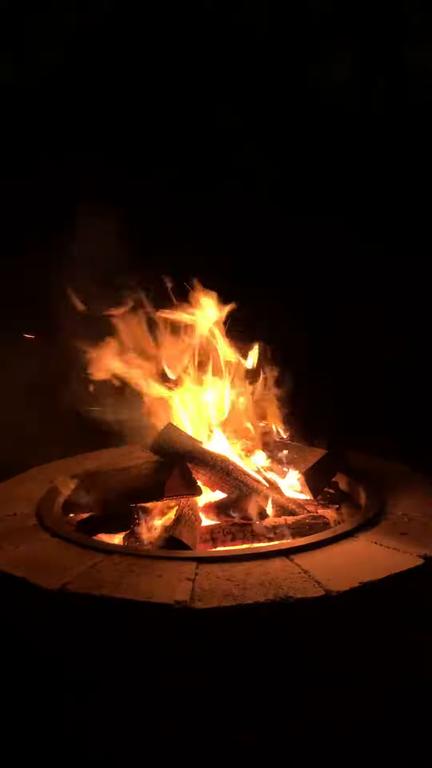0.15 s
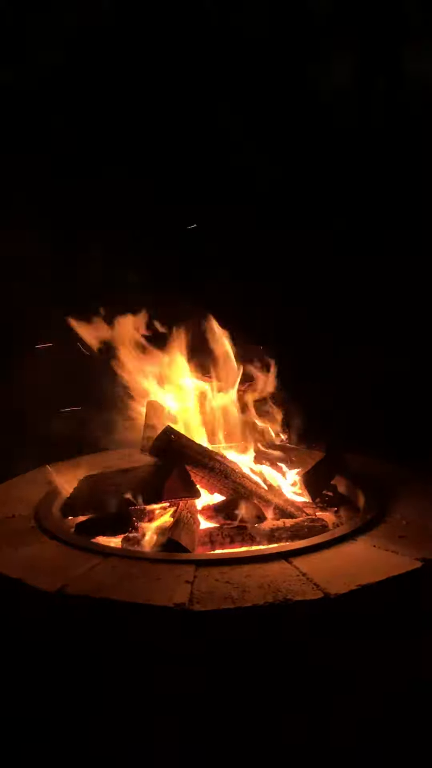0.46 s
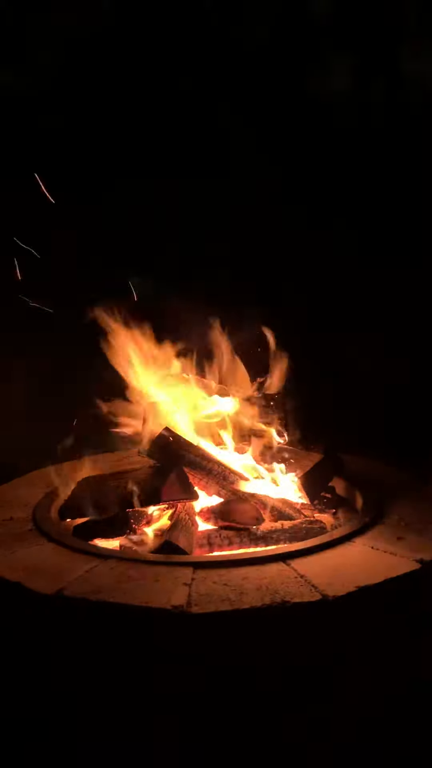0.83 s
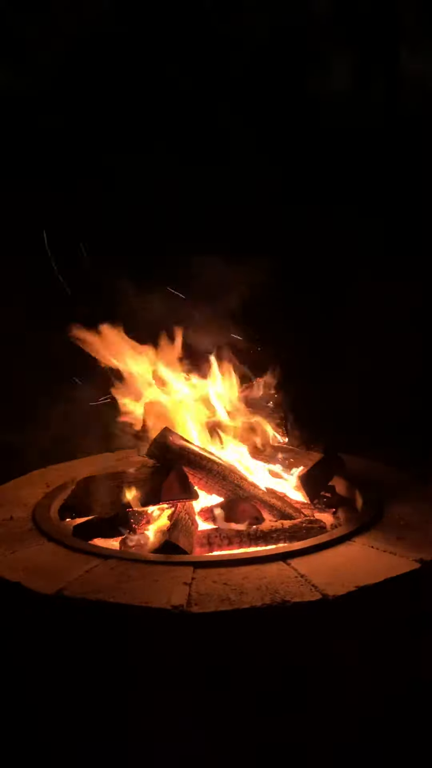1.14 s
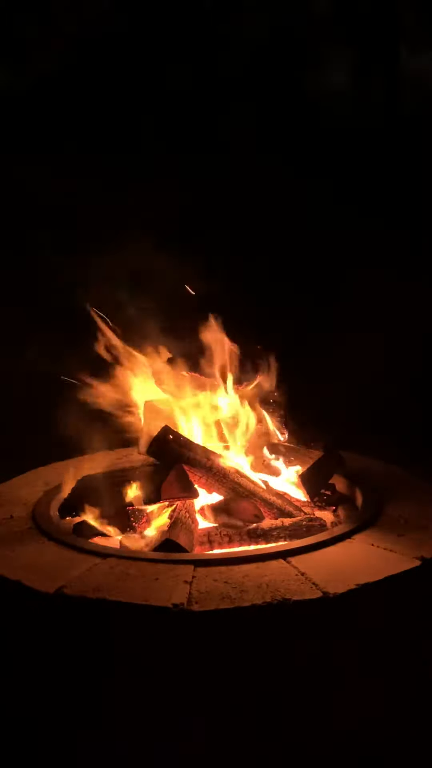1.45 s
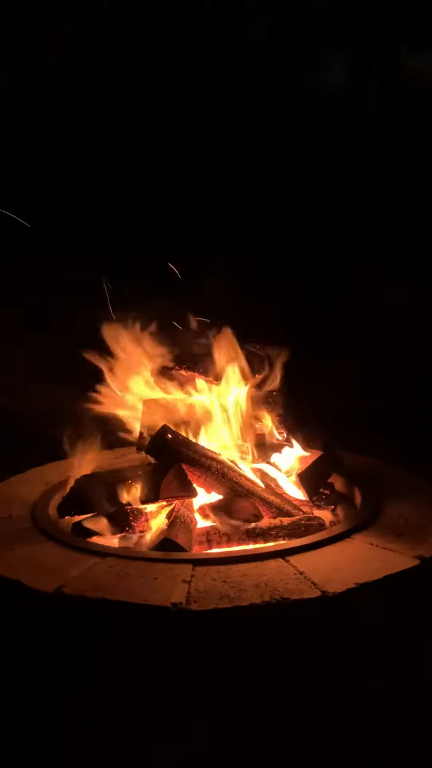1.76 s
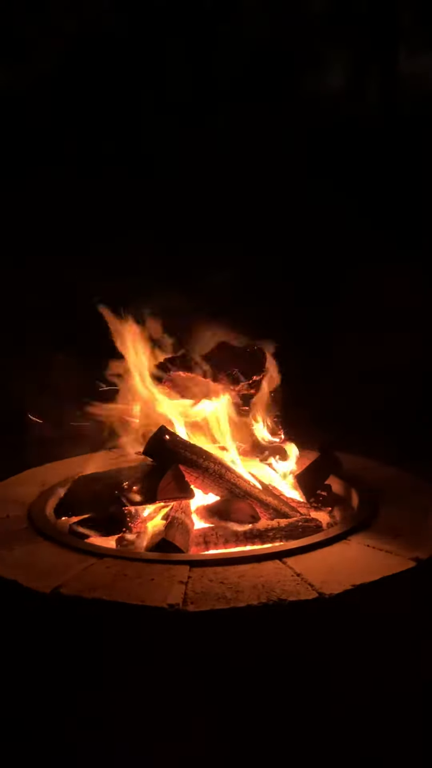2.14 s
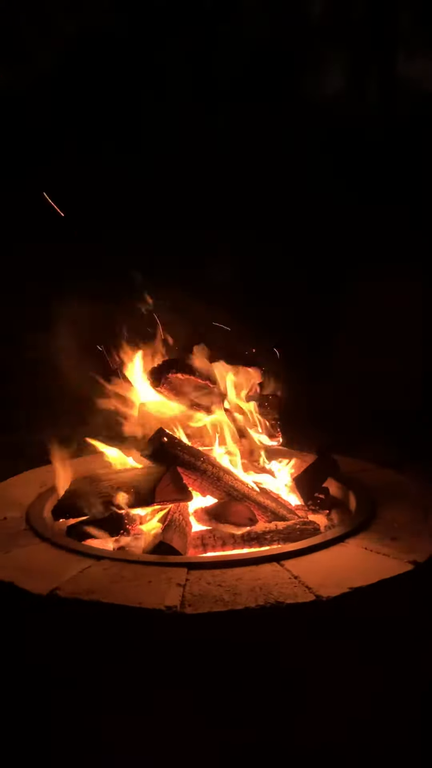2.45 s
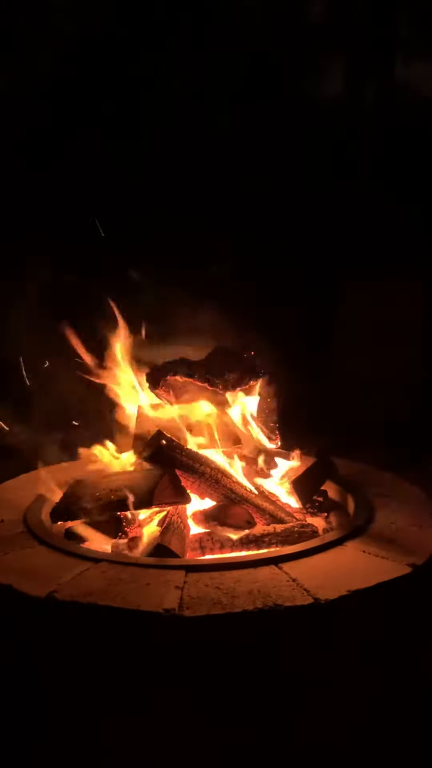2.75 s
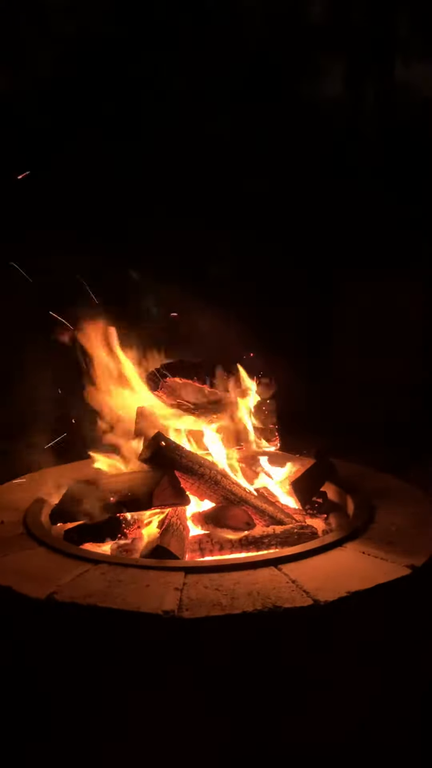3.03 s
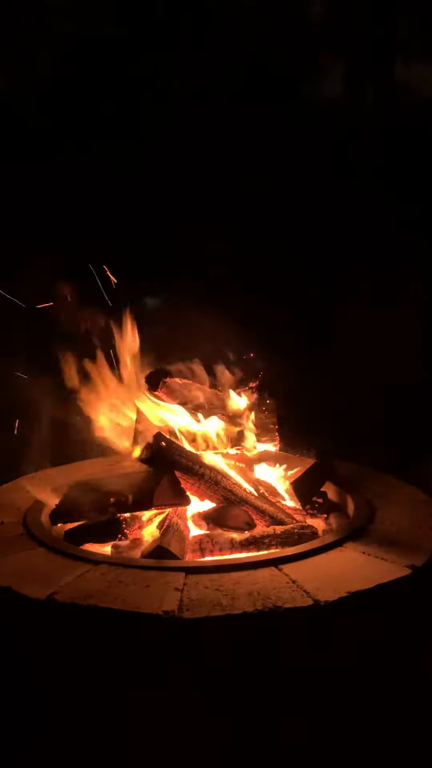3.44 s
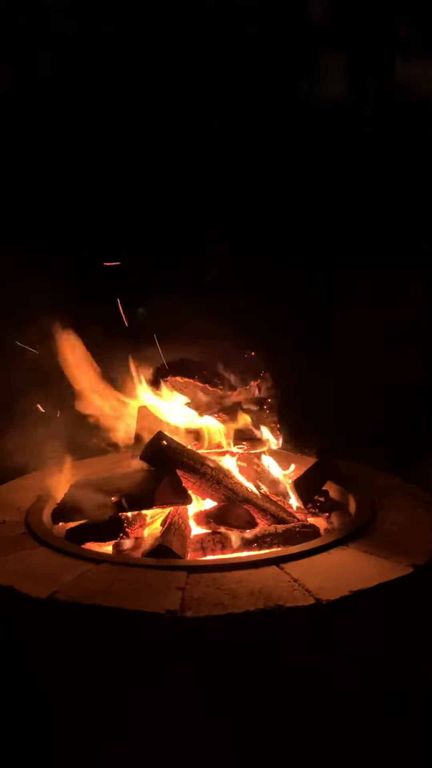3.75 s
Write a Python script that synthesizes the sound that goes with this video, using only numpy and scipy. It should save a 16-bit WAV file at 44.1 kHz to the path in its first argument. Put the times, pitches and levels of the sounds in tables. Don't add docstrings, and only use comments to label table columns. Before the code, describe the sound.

Close stereo microphone on a night campfire: woody pops come early, then sparser small crackles and a bright hard snap, while sap fizzes and whistles very high and a low hum sits under quiet open air.

```python
import sys
import numpy as np
from scipy import signal
from scipy.fft import rfft, irfft, next_fast_len
from scipy.io import wavfile
from scipy.ndimage import uniform_filter1d, map_coordinates

SR = 44100
rng = np.random.default_rng(int(sys.argv[2]) if len(sys.argv) > 2 else 0)


def how_loud(loudness_db):
    steps = np.asarray(loudness_db, float) / 20
    return 10 ** steps


def pcm_store(signal):
    levels = np.round(np.clip(np.atleast_2d(signal), -1, 1) * 32767)
    wavfile.write(sys.argv[1], SR, levels.astype(np.int16).T)


N = 171549

# (frequency [Hz], density [dB per Hz])
AIR_SPECTRUM = [(150, -20), (300, -8), (500, -10.5), (1030, -14.5), (2000, -23.5), (4000, -33), (5000, -37),
                (9000, -120)]
# (frequency [Hz], level [dB], wander [Hz])
MACHINE_TONES = [(59.2, -44.5, 1.5), (106.5, -46, 4), (212.5, -62, 3), (255.3, -59.5, 1.5),
                 (297, -62.5, 2.5), (413.5, -66, 2), (508.6, -69, 2), (707, -69.5, 2.5), (884, -72, 2),
                 (1002, -68, 2.5), (1226.5, -73, 3), (1592, -79, 1.5), (2565.5, -78.5, 2.4)]
# (time [s], level [dB])
MACHINE_LOAD = [
    (0.0, -60),
    (0.05, -41),
    (0.51, -54),
    (0.62, -37.5),
    (1.12, -45),
    (1.46, -39.5),
    (2.1, -49.5),
    (2.32, -43.5),
    (3.79, -43),
    (3.89, -54),
]
# (frequency [Hz], density [dB per Hz])
ROAR_SPECTRUM = [(20, -44), (32, -12.5), (50, -5.5), (92, 1.5), (120, -4), (160, -10.5), (260, -11.5),
                 (900, -100)]
# (time [s], level [dB])
FLAME_STRENGTH = [(0.0, -52.5), (0.46, -42.5), (0.49, -52.5), (0.65, -42.5), (1.19, -46.5), (1.38, -39.5),
                  (1.41, -48), (1.52, -42.5), (1.7, -47), (1.73, -41.5), (1.95, -44), (1.98, -38.5),
                  (2.23, -44.5), (3.89, -46)]
# (frequency [Hz], density [dB per Hz])
FIZZ_SPECTRUM = [(2000, -56), (4000, -6.5), (6000, -7), (7600, -14), (8800, -6), (10800, -10), (12800, 0.5),
                 (15000, -7), (15700, -10.5)]
# (time [s], gain [dB])
FIZZ_CHOKE = [(0, -3), (.85, -3), (.95, -13), (1.03, -2), (1.25, -6), (1.4, 0), (1.75, -6), (2, -1),
              (2.42, -1), (2.5, -10), (2.58, 0), (3.26, 0), (3.3, -11), (3.45, -5), (3.62, -14), (3.7, 0)]
# (time [s], pitch [Hz], level [dB], width [Hz])
WHISTLE = [(0, 14000, -64, 450), (.25, 14000, -68, 450), (.55, 14400, -64, 450), (.85, 13950, -70, 349),
           (.87, 12670, -58, 1900), (.97, 12900, -58, 1600), (.99, 13200, -61, 400),
           (1.06, 13250, -62, 500), (1.09, 14050, -62, 395), (1.2, 13950, -64, 347),
           (1.32, 14350, -64, 453), (1.39, 14100, -63, 450), (1.45, 14700, -62, 600),
           (1.51, 14200, -60, 501), (1.54, 12750, -81, 1494), (1.8, 11820, -64, 1290),
           (1.9, 12500, -76, 1000), (2.53, 13400, -74, 600), (2.57, 12600, -62, 1510),
           (2.68, 13300, -61, 710), (2.95, 13150, -59, 703), (3.05, 12900, -58, 1000),
           (3.2, 12700, -57.5, 1007), (3.28, 12900, -59, 1510), (3.4, 12900, -55, 1200),
           (3.47, 13300, -67, 496), (3.55, 12900, -57, 910), (3.66, 12850, -53, 1000),
           (3.7, 12200, -69, 1310), (3.89, 12300, -76, 1010)]
# (time [s], pitch [Hz], level [dB], width [Hz])
HIGH_JET = [
    (0, 16250, -73, 200),
    (2.2, 15400, -80, 194),
    (2.3, 15700, -75, 200),
    (2.55, 15600, -68, 197),
    (2.7, 15700, -76, 198),
]
LOW_JET = [
    (2.5, 11200, -90, 500),
    (2.6, 11200, -75, 500),
    (2.9, 11150, -74, 500),
    (3.15, 11000, -73, 500),
    (3.25, 11000, -90, 500),
]
# (time [s], snap peak [dB], knock over snap [dB], snap centre [Hz], width over centre [ratio])
POPS = [(.1459, -25, 0, 10700, 1.5), (.2543, -30, -11, 10100, 0.97), (0.3005, -39, -25, 12000, .3),
        (0.3308, -28, -10, 9000, 1.9), (.404, -40, -8, 6900, 0.55), (1.05, -44, -25, 12000, .4),
        (1.1098, -39.5, -15, 7000, 1.1), (1.3329, -39, -15, 7500, 0.43), (1.4127, -49, -25, 14000, .3),
        (1.4674, -37, -11, 5430, 0.47), (1.506, -40.5, -15, 6400, 0.48), (1.8845, -41, -15, 5920, 0.77),
        (2.3136, -20, -6, 11300, 0.23), (2.3665, -37, -25, 14500, .3), (2.882, -41, -23, 13000, .6),
        (2.8975, -28.5, -22, 11600, 0.4), (3.1536, -40.5, -25, 4600, 0.32), (3.22, -31, -26, 6100, 0.4),
        (3.2612, -39, -25, 11930, .3), (3.315, -37, -25, 8200, 0.37), (3.674, -43, -25, 12100, 0.28),
        (3.706, -45, -25, 12300, 0.27), (3.7726, -37.5, -22, 6000, 0.62)]
# (frequency [Hz], correlation [0-1])
PORT_LIKENESS = [(60, 1), (130, 0.98), (290, 0.92), (640, 0.78), (1400, 0.62), (2500, 0.72), (4200, 0.88),
                 (6000, 0.92)]
# (frequency [Hz], left over right [dB])
PORT_BALANCE = [(60, 0.3), (150, 1), (350, 2.5), (800, 1), (1500, -1), (3000, 0)]
# (frequency [Hz], phase [rad])
PORT_LEAD = [(0, 0), (1100, -.35), (1650, .4), (2600, .6), (3300, 1.2), (4700, 3.14), (8850, 9.42),
             (13200, 15.7), (15000, 18.7), (17000, 20)]
# (frequency [Hz], gain [dB])
MIC_ROLLOFF = [(15750, 0), (15900, -11), (16500, -10), (16800, -70)]

FIRE_TOP_HZ = 15780


def unit(x):
    return x / np.sqrt(np.mean(x ** 2) + 1e-20)


def along(points, hz):
    f, v = np.transpose(points)
    return np.interp(np.log(hz + 1), np.log(f + 1), v)


def curves(rows):
    s, *columns = np.transpose(rows)
    t = np.arange(N) / SR
    return [np.interp(t, s, column) for column in columns]


def wobble(rate):
    coarse = np.arange(0, N + 64, 64)
    knots = rng.standard_normal(600)
    return np.interp(np.arange(N), coarse, map_coordinates(knots, [coarse * rate / SR], mode="wrap"))


def filtered(x, response):
    m = next_fast_len(N + SR // 2)
    return irfft(rfft(x, m) * response(np.fft.rfftfreq(m, 1 / SR)), m)[..., :N]


def below_top(x):
    return filtered(x, lambda f: f < FIRE_TOP_HZ)


def rush(spectrum, patchy_db):
    z = signal.stft(rng.standard_normal((2, N)), nperseg=512)[2]
    field = uniform_filter1d(rng.standard_normal(z.shape[1:]), size=6, axis=0)
    field = uniform_filter1d(field, size=10, axis=1)
    pair = signal.istft(z * how_loud(patchy_db * unit(field)), nperseg=512)[1][:, :N]

    def mid_side(hz):
        angle = np.arccos(np.clip(along(PORT_LIKENESS, hz), -1, 1)) / 2
        return how_loud(along(spectrum, hz)) * [np.cos(angle), np.sin(angle)]

    mid, side = filtered(pair, mid_side)
    return unit(np.array([mid + side, mid - side]))


def outdoor_air():
    level_db = -50 + 0.6 * wobble(2.9)
    return how_loud(level_db) * rush(AIR_SPECTRUM, patchy_db=1.0)


def distant_machine():
    t = np.arange(N) / SR
    load_db, = curves(MACHINE_LOAD)
    load_share, sway_db = 0.68, 1.6
    tones = []
    for hz, db, wander in MACHINE_TONES:
        level = how_loud(db + 3.5 + sway_db * wobble(3 * wander))
        drift = np.cumsum(wander * wobble(4 * wander)) / SR
        tones.append(level * np.sin(2 * np.pi * (hz * t + drift)))
    return how_loud(load_share * (load_db - load_db.mean())) * tones[0] + sum(tones[1:])


def flames():
    strength_db, = curves(FLAME_STRENGTH)
    level_db = -42.5 + 0.4 * (strength_db - strength_db.mean())
    return how_loud(level_db) * rush(ROAR_SPECTRUM, patchy_db=0.86)


def embers():
    ticks_per_s, centre_hz, level_db, spread_db = 70, 9000, -59, 1.7
    u = rng.random((round(ticks_per_s * N / SR), 4))
    t = np.arange(64) / SR
    hz = np.clip(centre_hz * np.exp(2.34 * (u[:, 1:2] - .5)), 0, 16000)
    size = how_loud(level_db - spread_db * np.log(.03 + u[:, 2:3]))
    ticks = size * np.sin(2 * np.pi * hz * t) * np.exp(-t * hz / 2.0)
    at = (u[:, :1] * N).astype(int) + np.arange(64)
    return below_top(np.bincount(at.ravel(), ticks.ravel(), N + 64)[:N])


def jet(rows):
    hz, db, width = curves(rows)
    quaver, flicker_db, sputter_db_per_khz = .15, 2, 1.3
    knots = np.cumsum(width) / SR
    a, b = (map_coordinates(v, [knots], mode="wrap") for v in rng.standard_normal((2, 8000)))
    phase = 2 * np.pi * np.cumsum(hz + quaver * width * wobble(70)) / SR
    band = unit(a * np.cos(phase) + b * np.sin(phase))
    flicker = flicker_db * wobble(18)
    sputter = sputter_db_per_khz * width / 1000 * wobble(80)
    return how_loud(db + flicker + sputter) * band


def steam():
    level_db = -59.5 + 0.6 * wobble(5.52) + 1.14 * wobble(25.11)
    fizz = how_loud(level_db) * below_top(rush(FIZZ_SPECTRUM, patchy_db=1.5))
    choke_db, = curves(FIZZ_CHOKE)
    finest = filtered(fizz, lambda f: f > 13700)
    fizz = fizz + (how_loud(choke_db) - 1) * finest
    return fizz + jet(WHISTLE) + below_top(jet(HIGH_JET)) + jet(LOW_JET)


def resonance(f, hz, width_hz):
    return 1j * f * width_hz / (hz * hz - f * f + 1j * f * width_hz)


def ring(late, hz, db, t60_s):
    return how_loud(db - 60 * late / t60_s) * np.sin(2 * np.pi * hz * late)


def log_pops():
    out = np.zeros(N + SR)
    t, f = np.arange(2048) / SR, np.fft.rfftfreq(4096, 1 / SR)
    lead_s, tail_t60_s = .0013, .012
    late = np.maximum(t - lead_s, 0)
    lead = how_loud(-14 - 60 * t / tail_t60_s)
    burst = how_loud(-60 * late / .003) + how_loud(-14 - 60 * late / tail_t60_s)
    shape = lead + (t >= lead_s) * burst
    first_crack = 4.5 * (np.arange(len(t)) == np.argmax(late > 0) + 1)
    for s, db, knock_db, hz, width in POPS:
        scatter = shape * (rng.standard_normal(len(t)) + first_crack)
        snap = irfft(rfft(scatter, 4096) * resonance(f, hz, width * hz))[:len(t)]
        knock = ring(late, 2900, knock_db - 2.5, .0015)
        thump = ring(late, 1300, knock_db - 10, .003)
        start = round((s + .001 - lead_s) * SR)
        out[start:][:len(t)] += how_loud(db + 2.5) * (snap / np.abs(snap).max() + knock + thump)
    echo = how_loud(-26) * np.pad(out, (round(.009 * SR), 0))[:N]
    return out[:N] + echo


def scene():
    background = outdoor_air() + distant_machine()
    return background + flames() + embers() + steam() + log_pops()


def band_limit(x):
    return signal.sosfilt(signal.butter(12, 16660, fs=SR, output="sos"), x)


def record(dry):
    def ports(hz):
        lead = np.interp(hz, *np.transpose(PORT_LEAD))
        half = how_loud(along(PORT_BALANCE, hz) / 2) * np.exp(.5j * lead)
        return how_loud(along(MIC_ROLLOFF, hz)) * [half, 1 / half]

    return band_limit(filtered(dry, ports))


dry = scene()
out = record(dry)
pcm_store(out)
```